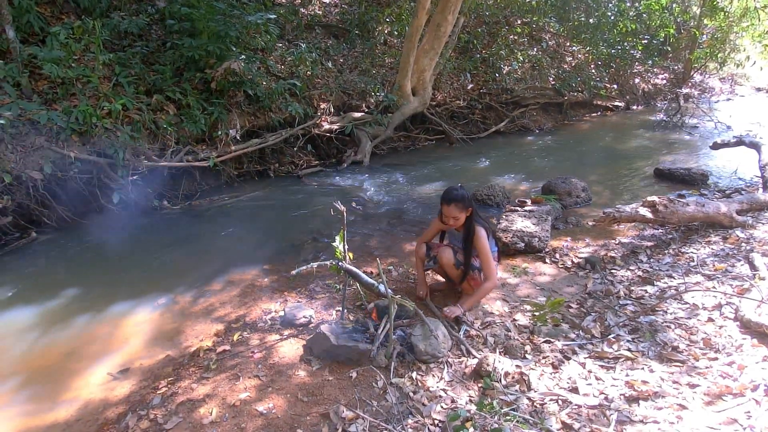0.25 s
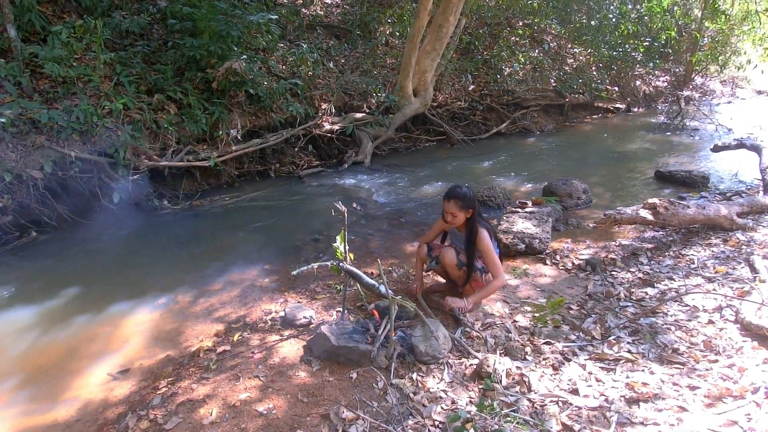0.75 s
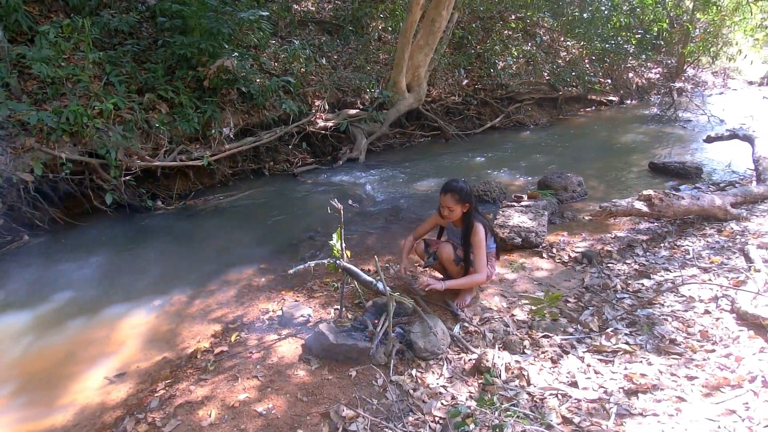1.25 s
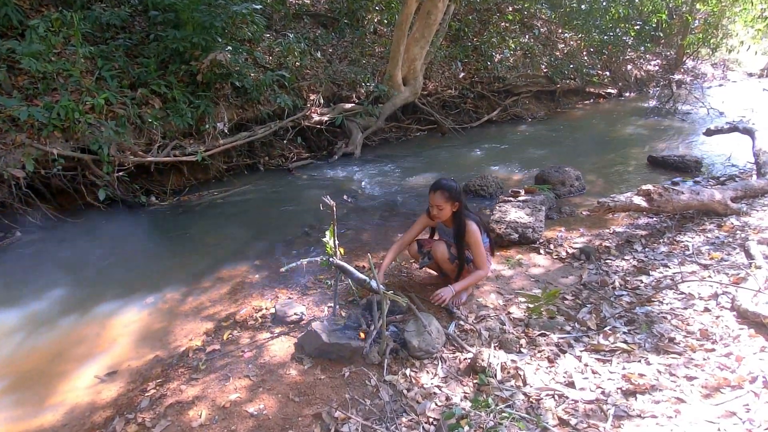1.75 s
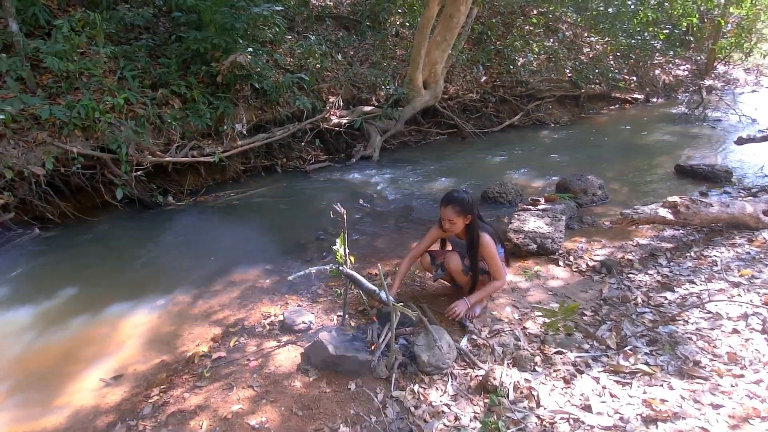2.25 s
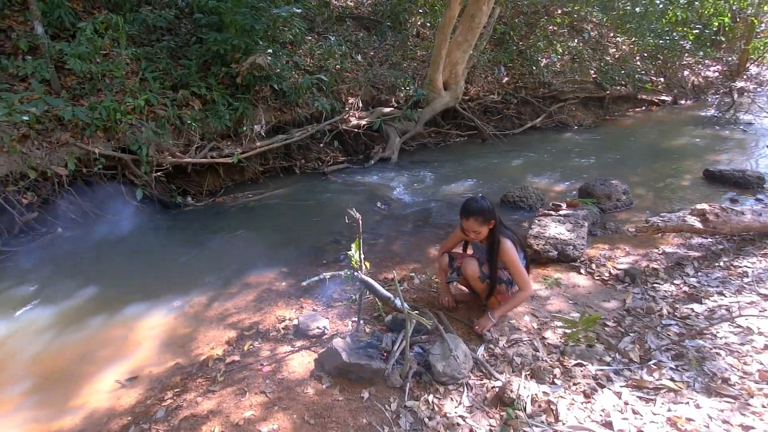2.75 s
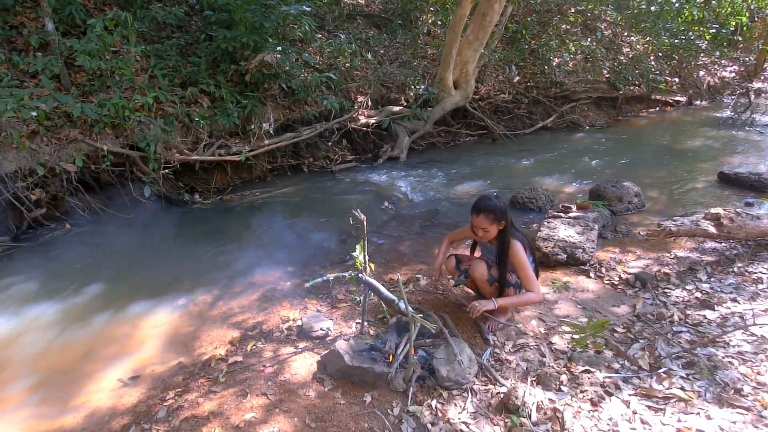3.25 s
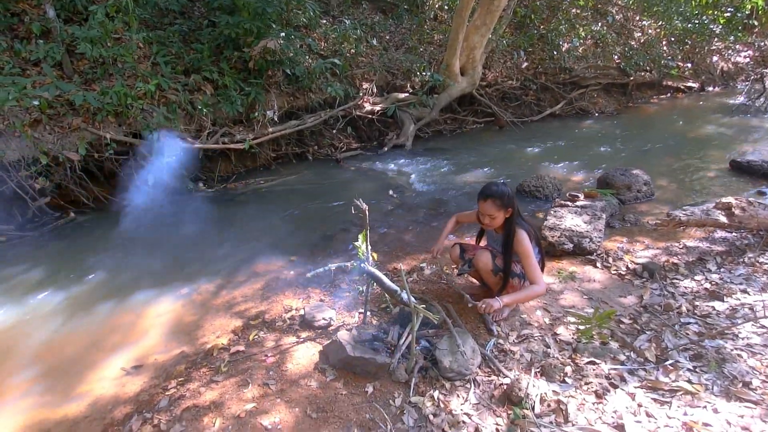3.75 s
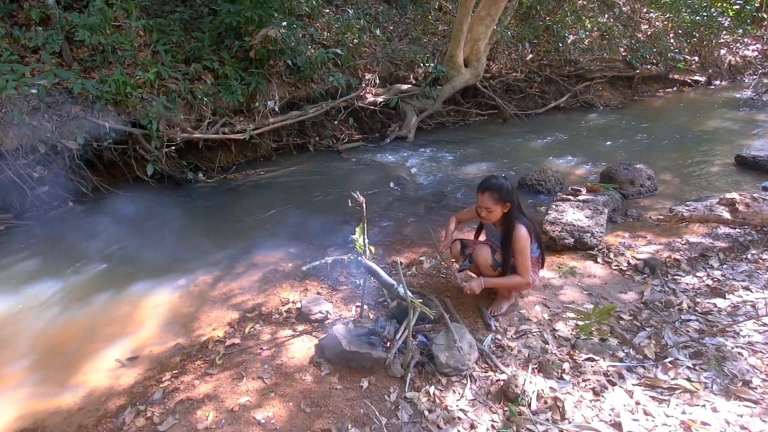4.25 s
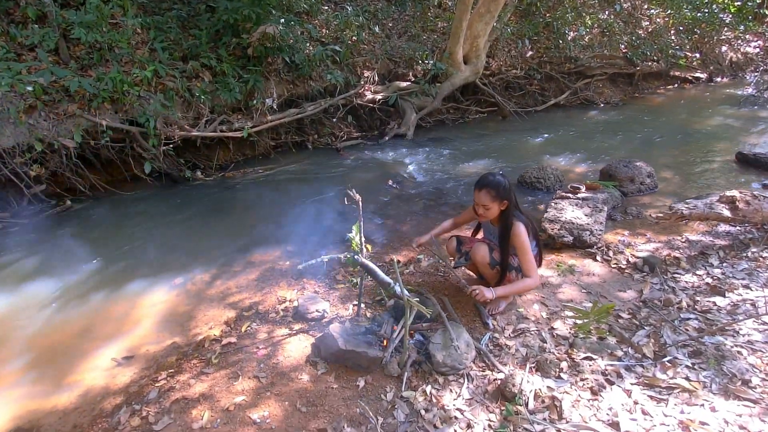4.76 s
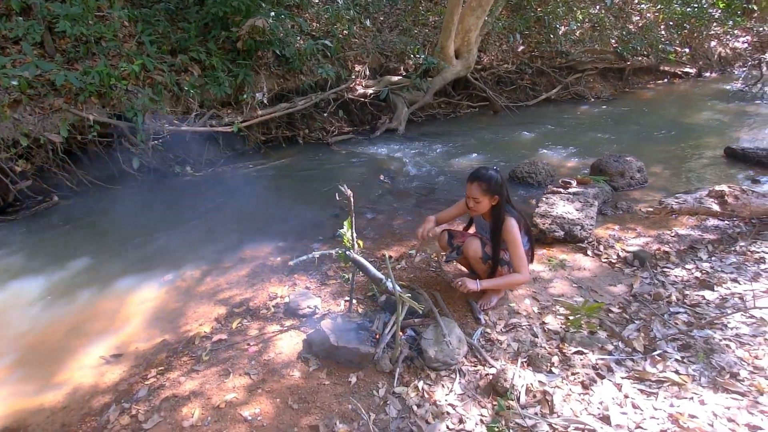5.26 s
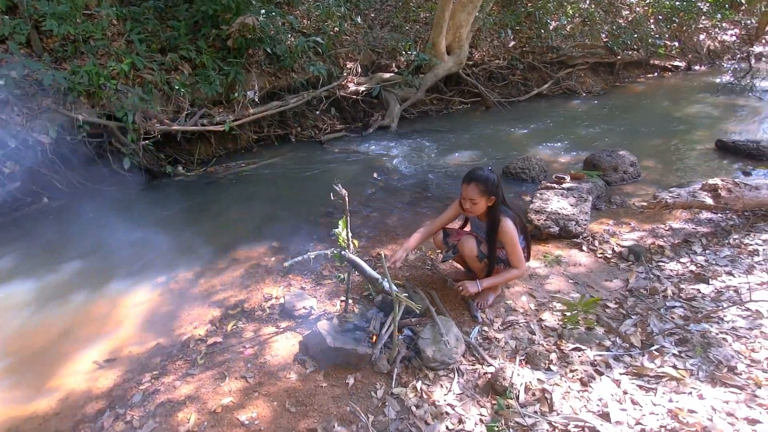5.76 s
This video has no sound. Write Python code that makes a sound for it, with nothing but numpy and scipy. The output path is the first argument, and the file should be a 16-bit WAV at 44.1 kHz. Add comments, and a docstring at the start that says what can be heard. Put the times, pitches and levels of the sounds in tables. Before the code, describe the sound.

A shallow forest creek rushes steadily over rocks, with small bubbles and occasional high plinks. Two cicadas to the right buzz, sliding between a higher and a lower pitch. Twigs crack lightly in a small fire, dry leaves rustle faintly and a breeze nudges the microphone. About four seconds in, a loud double snap makes everything dip in level, and the sound slowly recovers.

```python
"""A shallow creek runs over rocks in a forest: a rush of small splashes, bubbles and high plinks.
Two cicadas buzz, their tymbals ringing an abdomen that slides between a high and a low register.
Twigs crack in a small fire on the bank, dry leaves rustle, far insects trill and a breeze nudges
the microphones. One loud double snap makes the gain control duck everything; it recovers slowly."""
import sys
import numpy as np
from scipy import signal
from scipy.fft import rfft, irfft
from scipy.io import wavfile
from scipy.ndimage import uniform_filter1d

SR = 44100
rng = np.random.default_rng(int(sys.argv[2]) if len(sys.argv) > 2 else 0)


def transcribe(signal):
    """Save signal, clipped to [-1, 1], as a 16-bit WAV file at the path in sys.argv[1]."""
    frames = np.atleast_2d(signal).T
    limited = np.clip(frames, -1, 1)
    pcm = np.round(limited * 32767).astype(np.int16)
    wavfile.write(sys.argv[1], SR, pcm)


N = 265041
TIME_S = np.arange(N) / SR
BINS_HZ = np.fft.rfftfreq(N, 1 / SR)

# creek spectrum: (frequency [Hz], relative density [dB])
WATER_SPECTRUM = [(40, -4), (190, -14), (300, -9), (450, -9.5), (800, -4.5), (1300, -6.5), (2000, -7.5),
                  (2900, -8.5), (4200, -10.5), (6000, -11.5), (10000, -11), (13000, -15), (15500, -19)]
# breaking twigs: (time [s], energy as level over 1 ms [dB], low edge [Hz], left minus right [dB])
TWIG_SNAPS = [(.6645, -32, 2500, -2), (0.913, -34, 4000, -7), (1.2767, -35, 7000, 0),
              (1.6185, -29, 2500, -4), (2.6495, -36, 8000, -2), (3.337, -34, 7000, 0),
              (3.501, -30, 2500, -2), (3.7146, -30, 3000, -3), (3.8317, -15.5, 7100, -3.5),
              (3.967, -33.5, 4000, -1), (4.0556, -7, 2200, 3), (4.0671, 2, 6200, -10.5)]


def creek(mean_flow_db=0.67, surge_db=0.62, surge_hz=0.42):
    """Rush and babble surge with the flow; large bubbles and high plinks stand out."""
    # large bubbles: (time [s], relative level [dB], pitch [Hz])
    bubbles = [(.234, -30.5, 1034), (.493, -39.5, 434), (.641, -31.5, 1450), (.868, -34, 642),
               (.872, -43, 381), (2.845, -36, 833), (3.139, -36, 1124), (3.525, -42, 285),
               (3.918, -40, 461), (4.778, -39, 353), (5.448, -35, 923), (5.844, -35.5, 830),
               (5.973, -40.5, 365)]
    # short, high ringing plinks: drips, and a pair near 3.5 s that may be a ringing twig
    # (time [s], relative level [dB], pitch [Hz])
    plinks = [(0.2349, -35.5, 2740), (0.4424, -33, 3700), (2.1435, -32, 2560), (3.483, -29, 4740),
              (3.4987, -25.5, 4490), (3.8486, -28.5, 3500), (4.6523, -33, 3383)]
    flow = gain_of(mean_flow_db + surge_db * drift(surge_hz))
    near = single_rings(bubbles, trim_db=-1.5, cycles=6.0, rise=0.062, burst_gain=0.57)
    near += single_rings(plinks, trim_db=-2, cycles=11, rise=0.071, burst_gain=0.29)
    water = (rush() + babble()) * flow + near
    return delay_right(water, lag_s=4.3e-5) * gain_of([[-.4], [.4]])


def rush(level_db=-44, patchy_db=2.0, flicker_db=0.98):
    """White water: countless small splashes, patchy in the gurgle and smoother in the hiss."""
    frames, hz = N // 128 + 5, np.fft.rfftfreq(512, 1 / SR)
    # stereo coherence of the water: (frequency [Hz], correlation [0..1])
    coherence = [(100, 0.78), (300, 0.66), (700, 0.9), (1400, 0.74), (3100, 0.5), (6000, 0.052),
                 (15000, 0.04)]
    left_re, left_im, other_re, other_im, patches = rng.standard_normal((5, frames, len(hz)))
    patches = unit_rms(uniform_filter1d(uniform_filter1d(patches, size=12, axis=0), size=3, axis=1))
    flicker = unit_rms(uniform_filter1d(rng.standard_normal(frames), size=5))[:, None]
    shared = np.clip(log_interp(coherence, hz), 0, 1)
    left = left_re + 1j * left_im
    right = shared * left + np.sqrt(1 - shared ** 2) * (other_re + 1j * other_im)
    shape_db = log_interp(WATER_SPECTRUM, hz) + patchy_db * patches / (1 + hz / 5000)
    spectra = np.array([left, right]) * gain_of(shape_db + flicker_db * flicker)
    _, noise = signal.istft(spectra.transpose(0, 2, 1), nperseg=512, noverlap=384)
    return gain_of(level_db) * unit_rms(noise[:, :N])


def babble(bubbles_per_s=560, level_db=-51.5, pitches=40):
    """Small bubbles swarm behind the rocks; a few are much louder than the rest."""
    out = np.zeros(N)
    for hz in np.geomspace(360, 2500, pitches):
        births = np.zeros(N)
        at = rng.integers(0, N, int(bubbles_per_s * N / SR / pitches))
        excess_db = 3.9 * np.minimum(rng.exponential(1, len(at)), 3)
        births[at] = gain_of(excess_db + log_interp(WATER_SPECTRUM, hz))
        ring = rising_ring(hz, cycles=rng.uniform(4, 12), rise=.06 * rng.random())
        out += signal.oaconvolve(births, ring)[:N] * np.sqrt(hz)
    return gain_of(level_db) * unit_rms(out)


def single_rings(events, trim_db, cycles, rise, burst_gain):
    """Plops or plinks: each a short ring with a burst of noise, for a bubble its splash."""
    out = np.zeros(N)
    for start_s, db, hz in events:
        ring = rising_ring(hz / (1 + rise), cycles, rise)
        burst = unit_rms(bandpass(rng.standard_normal(len(ring)), hz * 0.51, hz * 1.5))
        burst *= np.exp(-np.linspace(0, 5, len(ring)))
        add(out, start_s, gain_of(db + trim_db) * (ring + burst_gain * burst))
    return out


def rising_ring(hz, cycles, rise):
    """Damped tone that climbs like a bubble nearing the surface; cycles and rise per decay time."""
    age = np.arange(0, 5, hz / cycles / SR)
    ring = np.sin(2 * np.pi * cycles * (age + rise * age ** 2 / 2))
    return ring * np.exp(-age) * (1 - np.exp(-age / 0.098))


def cicadas(lead_s=.58, growth_db_per_s=0.72):
    """Two cicadas to the right; the farther sings the same phrases early and grows louder."""
    near = cicada(*song(TIME_S), click_hz=422.0, lag_s=-4.9e-5, wet_db=-5.0)
    far = cicada(*song(TIME_S + lead_s), click_hz=435.0, lag_s=-3.6e-5, wet_db=-3.5)
    return gain_of(-3) * near + gain_of(-12.5 + growth_db_per_s * TIME_S) * far


def song(time_s, taut_hz=8026, slack_hz=6263, slack_db=-44.9, tiring_db_per_s=1.2):
    """Level and body resonance follow abdominal tension: quick climb, tiring hold, slower sag."""
    # phrases: (tightens [s], slackens [s], relative level [dB])
    phrases = [(-.4, 0.5, -41), (1.07, 2.02, -41), (2.6, 3.57, -41), (4.12, 5.14, -42), (5.74, 8.5, -41)]
    tighten_s, sag_s = .16, .14
    swell_db, swell_lead_s, swell_s = 2.2, .11, .08  # the low note swells before each climb
    level_db, body_hz = slack_db, slack_hz
    for start_s, end_s, db in phrases:
        age_s = time_s - start_s
        sag = np.exp(-(np.maximum(time_s - end_s, 0) / sag_s) ** 1.2)
        tension = np.clip(age_s / tighten_s, 0, 1) * sag
        level_db += tension * (db - tiring_db_per_s * age_s - slack_db)
        level_db += swell_db * np.exp(-((age_s + swell_lead_s) / swell_s) ** 2)
        body_hz += tension * (taut_hz - slack_hz)
    return level_db, body_hz


def cicada(level_db, body_hz, click_hz, lag_s, wet_db, rib_fade_db=3.5, ribs=5):
    """Tymbal ribs buckle in fading runs and ring the abdomen; slack is slower, less even, raspier."""
    def abdomen(x):
        return unit_rms(bandpass(resonate(x, body_hz, width_hz=1550), 5780, 9570, order=7))

    slack = np.clip((7600 - body_hz) / 1300, 0, 1)
    jitter = (.0026 + .008 * slack) * drift(40)
    turns = np.cumsum(click_hz * (1 - .05 * slack + jitter)) / SR
    at = np.flatnonzero(np.diff(np.floor(turns)))
    rib = np.arange(len(at)) % ribs
    subsample = (np.ceil(turns[at]) - turns[at]) / (turns[at + 1] - turns[at])
    clicks = np.zeros(N)
    clicks[at], clicks[at + 1] = np.array([1 - subsample, subsample]) * gain_of(-rib_fade_db * rib)
    rasp_share = .42 + .23 * slack
    rasp = rng.standard_normal(N) * (1 + .5 * np.cos(2 * np.pi * turns / ribs))
    voice = np.sqrt(1 - rasp_share) * abdomen(clicks) + np.sqrt(rasp_share) * abdomen(rasp)
    buzz = gain_of(level_db) * unit_rms(voice)
    return delay_right(buzz, lag_s) + gain_of(wet_db) * forest(buzz, t60_s=0.19, damping_hz=12000)


def fire(crack_s=0.00061, bend_s=0.000394, ring_db=-21, ring_s=.0035, top_hz=13800, wet_db=-12.0):
    """Each twig breaks with a sharp crack and a brief splintering tail; the trees echo it."""
    def at_level(x, db):
        return x * gain_of(db) * np.sqrt(SR / 1000) / np.linalg.norm(x)

    age_s = TIME_S[:SR // 40]
    direct, radiated = np.zeros((2, N)), np.zeros(N)
    decay = np.exp(-age_s / crack_s)
    # bending waves carry the treble out first, so the crack sweeps down
    sweep = np.sin(2 * np.pi * 17000 * bend_s * np.log(1 + age_s / bend_s)) * decay
    fibres = 0.89 * decay + gain_of(ring_db) * np.exp(-age_s / ring_s)
    onset = 1 - np.exp(-age_s / .00012)
    for start_s, db, low_hz, balance_db in TWIG_SNAPS + ember_ticks():
        fracture = onset * (sweep + fibres * rng.standard_normal(len(age_s)))
        crack = bandpass(fracture, low_hz, top_hz, order=3)
        add(direct, start_s, at_level(crack, db) * gain_of(balance_db * np.array([[.5], [-.5]])))
        # summed over all directions the crack has an even spectrum
        pulse = bandpass(signal.unit_impulse(len(age_s)), low_hz, top_hz, order=1)
        add(radiated, start_s, at_level(pulse, db))
    return direct + gain_of(wet_db) * forest(radiated, t60_s=.36, damping_hz=14000)


def ember_ticks(ticks_per_s=1.5, level_db=-42, spread_db=3, low_hz=5500):
    """Faint snaps at random times, as rows like TWIG_SNAPS."""
    draws = rng.random((int(ticks_per_s * N / SR), 2))
    return [(when * N / SR, level_db + spread_db * (2 * size - 1), low_hz, 0) for when, size in draws]


def splinter(level_db=-21, hz=12090, t60_s=.045):
    """A splinter thrown off by the last, loudest snap rings briefly."""
    age_s = np.maximum(TIME_S - TWIG_SNAPS[-1][0], 0)
    return gain_of(level_db - 60 * np.minimum(age_s / t60_s, 10)) * np.sin(2 * np.pi * hz * age_s)


def breeze(buffet_hz=75, buffet_s=0.016):
    """Low turbulence, independent at each microphone, with a few distinct shoves."""
    # buffets of air: (time [s], left [dB], right [dB])
    buffets = [(0.434, -33, -43), (2.94, -53, -32), (3.167, -48, -29), (3.325, -39, -30), (3.714, -28, -32),
               (5.771, -30, -41.5)]
    eddies = bandpass(rng.standard_normal((2, N)), 22.7, 78.7)
    out = unit_rms(bandpass(eddies, 8.2, 164)) * wind_strength()
    age_s = TIME_S[:int(buffet_s * SR)]
    shove = np.sin(2 * np.pi * buffet_hz * age_s) * np.hanning(len(age_s))
    for start_s, left_db, right_db in buffets:
        add(out, start_s, gain_of([[left_db], [right_db]]) * shove)
    return out


def wind_strength(lull_left_db=-58.5, lull_right_db=-55.5):
    """Gusts swell and fade over a steady lull, adding in power."""
    # gusts: (centre [s], length [s], left [dB], right [dB])
    gusts = [(.18, 0.21, -45.5, -44.5), (0.49, 0.31, -50, -41), (1.64, .15, -55, -47),
             (2.38, 0.32, -60, -41), (3.355, 0.41, -42.5, -38), (3.736, 0.17, -36.5, -35.5),
             (3.96, 0.43, -46, -40.5), (4.338, .25, -42, -53), (4.95, 0.48, -49, -43),
             (5.453, 0.3, -43, -39.5), (5.806, 0.4, -42, -47)]
    power = gain_of([[lull_left_db], [lull_right_db]]) ** 2
    for centre_s, length_s, left_db, right_db in gusts:
        swell = np.exp(-(2 * (TIME_S - centre_s) / length_s) ** 2)
        power = power + (gain_of([[left_db], [right_db]]) * swell) ** 2
    return np.sqrt(power)


def leaves(grain_db=3):
    """Stirred dry leaves give clumps of tiny crackles."""
    # rustles: (time [s], length [s], level [dB])
    rustles = [(0.329, 0.11, -48), (0.904, 0.13, -53), (2.627, 0.25, -51), (3.068, 0.084, -47),
               (3.213, 0.18, -45.5), (3.462, 0.065, -43), (3.768, 0.069, -49)]
    out = np.zeros((2, N))
    for start_s, length_s, db in rustles:
        n = int(length_s * SR)
        grains = rng.standard_normal((2, n)) * gain_of(grain_db * drift(500)[:n])
        crackle = unit_rms(bandpass(grains, 1800, 11000, order=1))
        add(out, start_s, gain_of(db) * crackle * signal.windows.tukey(n, .5))
    return out


def far_insects(hz=3440, width_hz=120, level_db=-59.5, waver_db=1.2):
    """Distant insects blur into one narrow, wavering band."""
    trill = unit_rms(resonate(rng.standard_normal(N), hz, width_hz) * gain_of(waver_db * drift(13)))
    echo = forest(trill, t60_s=0.34, damping_hz=9100)
    return gain_of(level_db) * (delay_right(trill, lag_s=3e-5) + .5 * echo)


def forest(x, t60_s, damping_hz):
    """Scatter from trunks and leaves: sparse decaying taps, independent per channel."""
    age_s = TIME_S[:SR // 2]
    shape = (2, len(age_s))
    taps = rng.standard_normal(shape) * (rng.random(shape) < .15) * (age_s > .004)
    tail = bandpass(taps * gain_of(-60 * age_s / t60_s), 200, damping_hz, order=1)
    return signal.fftconvolve(x[None], tail / np.linalg.norm(tail[0]), axes=1)[:, :N]


def centre_treble(pair, corner_hz=4500, depth=.92):
    """At times the treble draws to the centre: the right channel's crossfades to the left's."""
    # spans of centred treble: (start [s], end [s])
    spans = [(.53, .61), (.92, 1.03), (2.03, 2.13), (2.26, 2.38), (2.59, 2.92), (3.19, 3.35), (3.53, 3.68),
             (3.85, 4.5)]
    gate = sum(1. * ((TIME_S > start_s) & (TIME_S < end_s)) for start_s, end_s in spans)
    treble = irfft(rfft(pair) / (1 + (corner_hz / (BINS_HZ + 1)) ** 24), N)
    return pair + depth * uniform_filter1d(gate, size=900) * (treble[0] - treble)


def gain_of(db):
    return 10 ** (np.asarray(db) / 20)


def unit_rms(x):
    return x / np.sqrt(np.mean(x ** 2) + 1e-20)


def log_interp(points, hz):
    knots_hz, values = np.transpose(points)
    return np.interp(np.log(hz + 1), np.log(knots_hz + 1), values)


def add(mix, start_s, sound):
    part = mix[..., max(round(start_s * SR), 0):][..., :sound.shape[-1]]
    part += sound[..., :part.shape[-1]]


def bandpass(x, low_hz, high_hz, order=2):
    edges_hz = [min(low_hz, high_hz / np.sqrt(2)), high_hz]
    return signal.sosfilt(signal.butter(order, edges_hz, "band", fs=SR, output="sos"), x)


def drift(rate_hz):
    """Low-passed noise, rms 1."""
    return unit_rms(irfft(rfft(rng.standard_normal(N)) * np.exp(-(BINS_HZ / rate_hz) ** 2), N))


def resonate(x, hz, width_hz):
    """Two-stage resonance; hz may vary per sample."""
    carrier = np.exp(2j * np.pi * np.cumsum(hz * np.ones(N)) / SR)
    pole = np.exp(-np.pi * width_hz / SR)
    baseband = signal.lfilter([(1 - pole) ** 2], [1, -2 * pole, pole * pole], x * carrier.conj())
    return 2 * (carrier * baseband).real


def delay_right(x, lag_s):
    """The right microphone hears the sound lag_s after the left."""
    return irfft(rfft(x) * np.exp(-2j * np.pi * BINS_HZ * lag_s * np.array([[0], [1]])), N)


def scene():
    """Everything heard from the bank."""
    return centre_treble(creek() + cicadas() + far_insects() + fire() + splinter() + leaves()) + breeze()


def record(dry, threshold_db=-29, slope=0.78, recovery_db_per_s=3.5, attack_s=0.013, edge_hz=15600):
    """Gain control that falls fast and recovers slowly, full-scale clipping, then a low-pass."""
    def smooth(x, tau_s):
        pole = np.exp(-1 / (tau_s * SR))
        return signal.lfilter([1 - pole], [1, -pole], x)

    power_db = 10 * np.log10(smooth((dry ** 2).mean(0), 0.033) + 1e-12)
    demand_db = slope * np.maximum(power_db - threshold_db, 0)
    recovery_db = TIME_S * recovery_db_per_s
    held_db = np.maximum.accumulate(demand_db + recovery_db) - recovery_db
    duck_db = smooth(smooth(held_db, attack_s / 2), attack_s / 2)
    clipped = np.clip(dry * gain_of(-duck_db), -1, 1)
    lowpass = signal.firwin(255, edge_hz, window=("kaiser", 8), fs=SR)
    return signal.oaconvolve(clipped, lowpass[None], "same")


dry = scene()
out = record(dry)
transcribe(out)
```